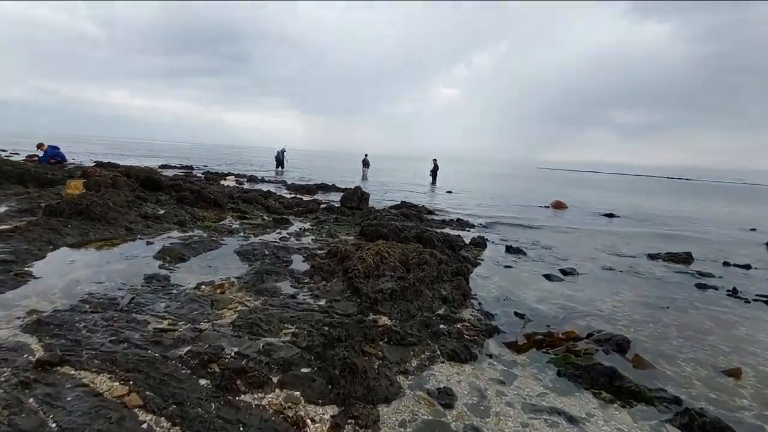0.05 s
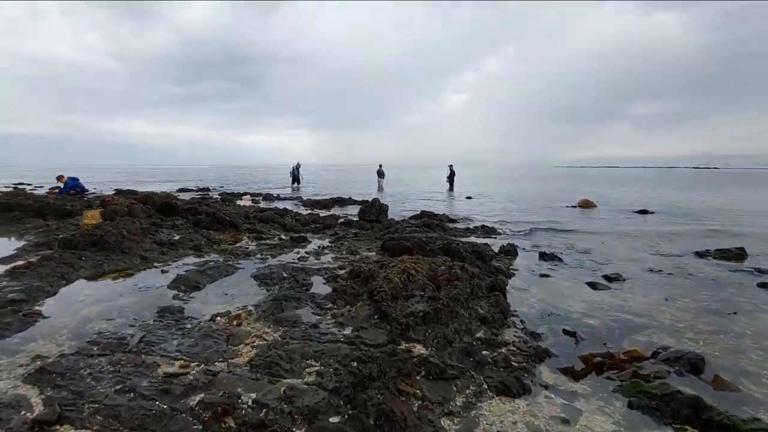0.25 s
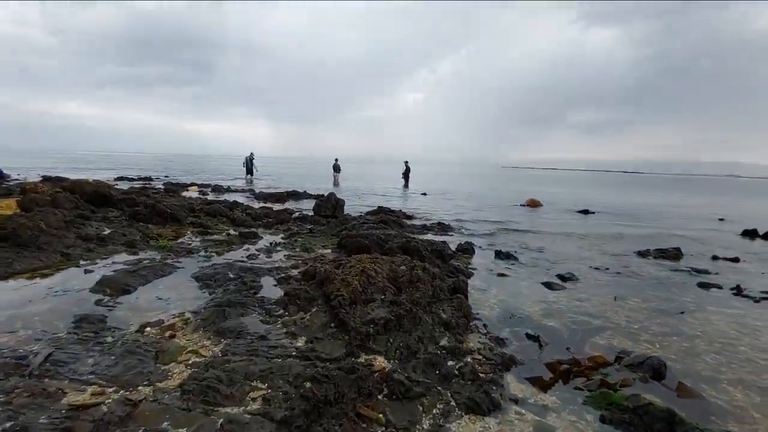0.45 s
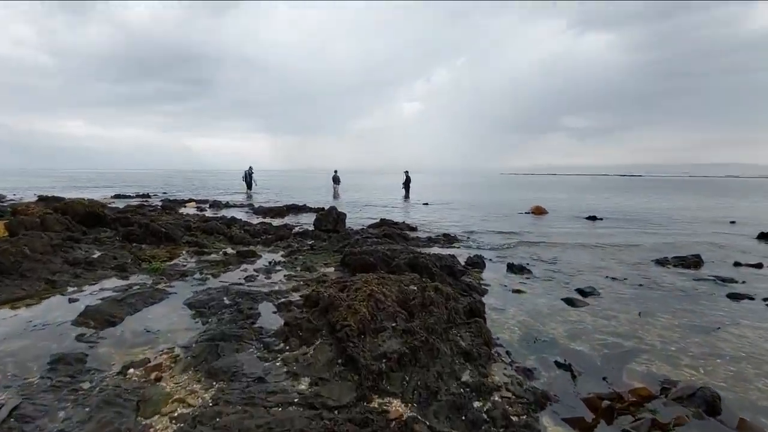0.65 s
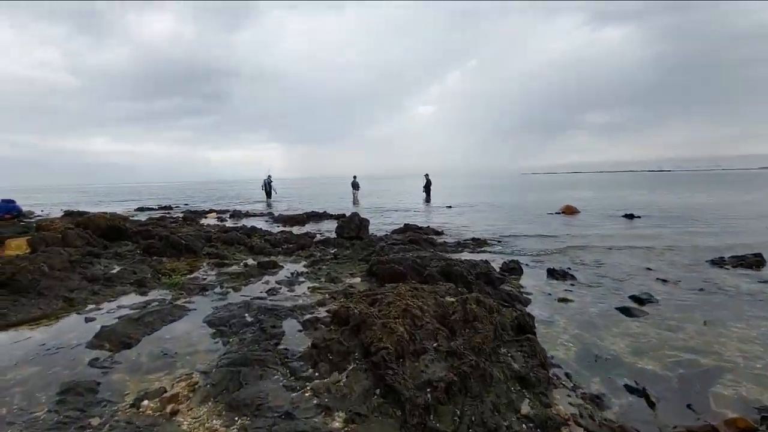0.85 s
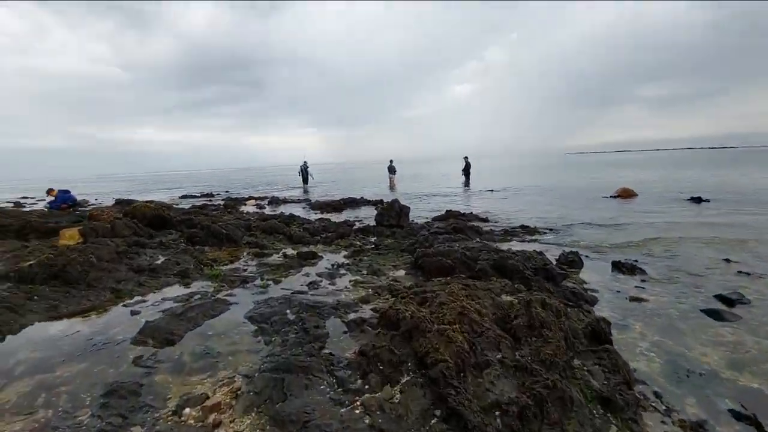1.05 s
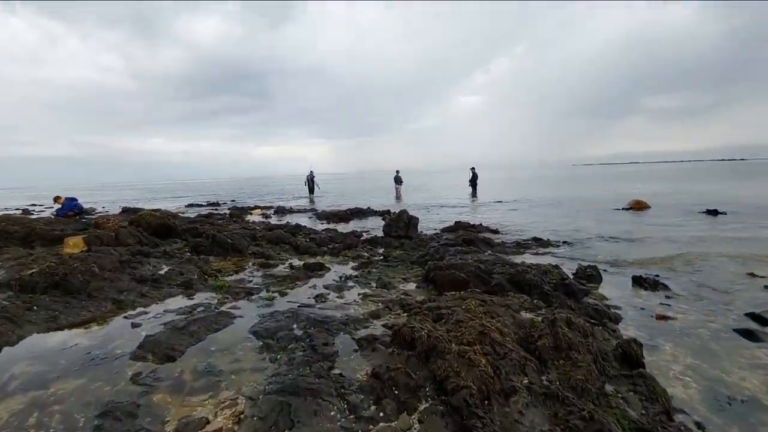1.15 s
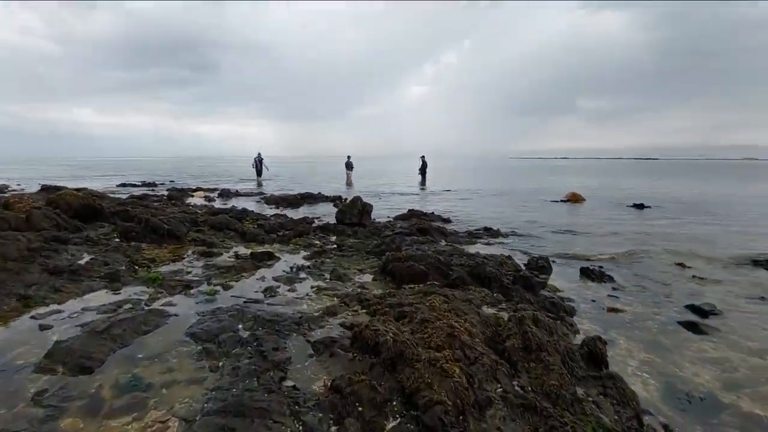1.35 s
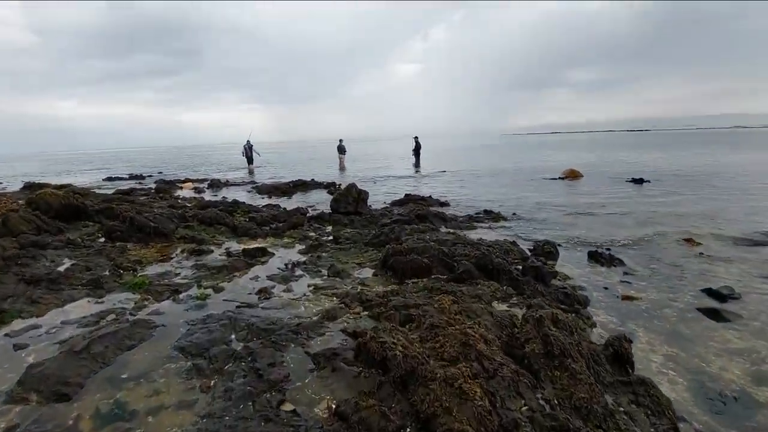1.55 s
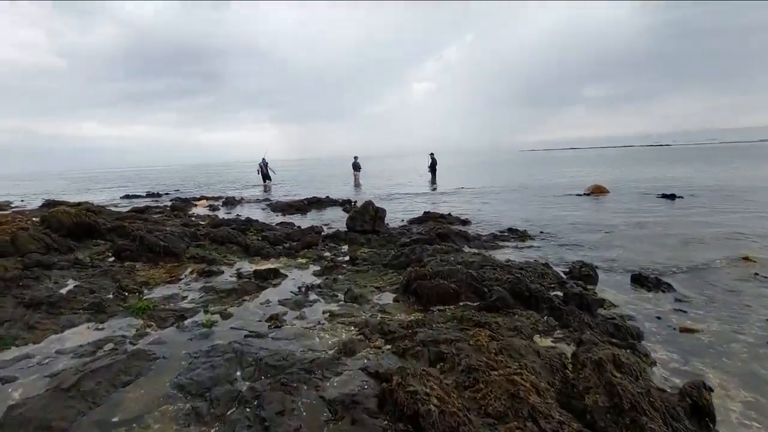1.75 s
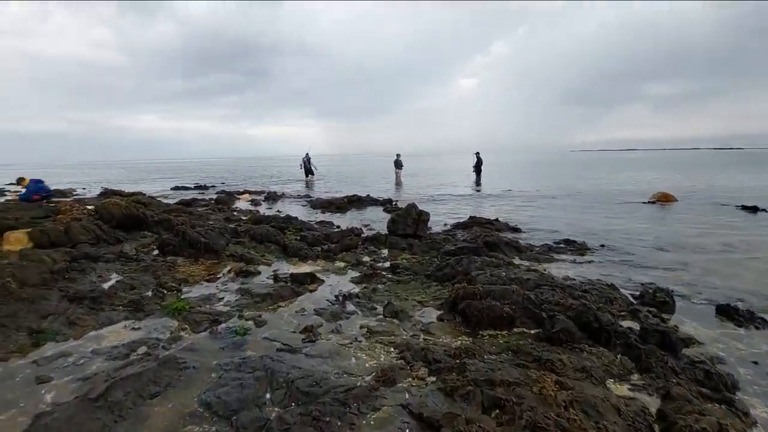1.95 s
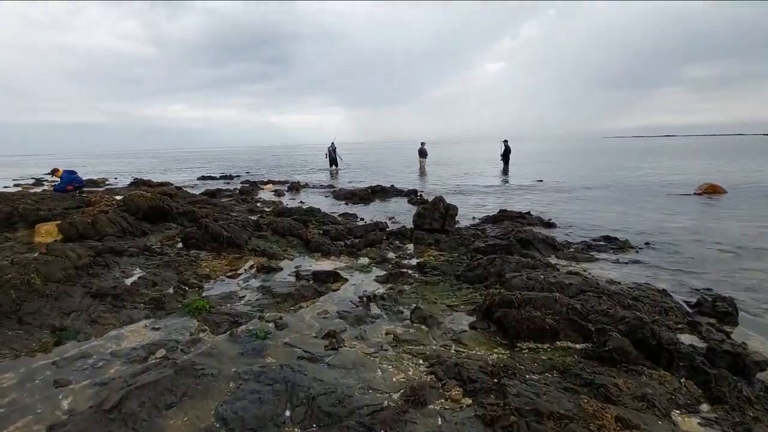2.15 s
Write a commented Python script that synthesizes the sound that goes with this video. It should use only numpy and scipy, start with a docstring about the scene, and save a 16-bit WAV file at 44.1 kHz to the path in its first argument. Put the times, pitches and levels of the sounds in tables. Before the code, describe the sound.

Footsteps knock and crunch on wet, gritty shore rock, with water trickling and wind buffeting.

```python
"""Someone walks over wet, weedy shore rock with a small camera. From the start a calm sea washes,
water fizzes and trickles, and wind buffets the microphone, mostly on the left. A few grains snap,
then from a quarter second on a step lands about every half second: soles knock, grit crunches,
grains and weed bladders snap. From 1.4 s air pockets gurgle in the pools. The last step comes
near 1.8 s, and the sea and the trickle are at their loudest toward the end."""
import sys
import numpy as np
from scipy import signal
from scipy.fft import rfft, irfft
from scipy.io import wavfile
from scipy.ndimage import uniform_filter1d

SR = 44100
rng = np.random.default_rng(int(sys.argv[2]) if len(sys.argv) > 2 else 0)


def dump_mix(stems):
    """Bounce the given channels to the path in sys.argv[1] as a 16-bit WAV at rate SR."""
    frames = np.atleast_2d(stems).T  # one column per channel
    limited = np.clip(frames, -1, 1)  # hard clip at full scale
    pcm = np.round(limited * 32767).astype(np.int16)
    wavfile.write(sys.argv[1], SR, pcm)


N = 97020  # 2.2 seconds

# The tone of crunching grit as the camera's microphone hears it, with a dip at 7-9 kHz.
# Each row: frequency in Hz, level in dB.
GRIT_COLOUR = [(100, -28.5), (300, -2.5), (800, -2.5), (1500, -0.5), (2800, -3), (5400, -1.5), (6800, -11),
               (8600, -14), (11500, -10), (15500, -17)]
STEP_WIDTH = 0.66  # 0 is centred, 1 is wide
SPRAY_PER_S, SPRAY_SPREAD_DB = 16000, 3  # the tiny clicks in fizz and trickle
GLIDE_PER_S = 6.07  # a bubble's pitch climbs by this many times its starting pitch each second


def undb(db):
    """Turn decibels into a number to multiply by."""
    return 10 ** (np.asarray(db) / 20)


def unit(x):
    """Scale a signal to an average power of 1."""
    return x / np.sqrt(np.mean(x ** 2) + 1e-20)


def clock():
    """The time of each sample in seconds."""
    return np.arange(N) / SR


def freqs():
    """The frequency in Hz of each slot in a spectrum."""
    return np.maximum(np.arange(N // 2 + 1) * SR / N, 1)


def shape(points):
    """Join (Hz, dB) points into a gain for every frequency."""
    hz, db = np.array(points).T
    return undb(np.interp(np.log(freqs()), np.log(hz), db))


def colour(x, gain):
    """Change the tone by a gain for every frequency; white noise keeps its power."""
    cepstrum = irfft(np.log(unit(gain) + 1e-9), N)
    # Fold the second half onto the first, so the filter rings after a click and not before.
    cepstrum[1:N // 2] *= 2
    cepstrum[N // 2 + 1:] = 0
    return irfft(rfft(x) * np.exp(rfft(cepstrum)), N)


def curve(points):
    """Join (seconds, dB) points into a gain for every sample."""
    return undb(np.interp(clock(), *np.array(points).T))


def wander(turns_per_s):
    """A random drift, about 1 in size."""
    hold = int(SR / turns_per_s)
    stairs = np.repeat(rng.standard_normal(N // hold + 1), hold)
    return unit(uniform_filter1d(stairs, hold)[:N])


def spread(pair, width, wide_hz=1090):
    """Mix two unrelated signals into left and right; the bass stays in the middle."""
    share = width * freqs() / np.hypot(freqs(), wide_hz)
    mid, side = rfft(pair)
    return irfft(np.array([mid + share * side, mid - share * side]) / np.sqrt(1 + share ** 2), N)


def grains(per_s, spread_db):
    """Two streams of tiny clicks, a few much larger than the rest."""
    size = undb(spread_db * np.minimum(rng.exponential(size=(2, N)), 5))
    hits = rng.random((2, N)) < per_s / SR
    return unit(hits * size * np.sign(rng.standard_normal((2, N))))


def ring(start, hz, decay_s, rise_s, glide=0, left_lag_s=0.0001):
    """A fading tone that reaches the left side a moment after the right."""
    out = np.zeros((2, N))
    first = int(np.clip(start * SR, 0, N - 1))
    last = min(N, first + int(10 * (decay_s + rise_s) * SR))
    t = np.maximum(np.arange(first, last) / SR - start - np.array([[left_lag_s], [0]]), 0)
    level = (1 - np.exp(-(t / rise_s) ** 2)) * np.exp(-t / decay_s)
    out[:, first:last] = level / (level.max() + 1e-9) * np.sin(2 * np.pi * hz * t * (1 + glide * t / 2))
    return out


def bubbles(per_s, low_hz, octaves, decay_cycles):
    """Bubbles ring at random times, pitches and places, each sliding upward."""
    out = np.zeros((2, N))
    for when, pitch, size, side in rng.random((1000, 4))[:int(per_s * N / SR)]:
        hz = low_hz * 2 ** (octaves * pitch)
        first = int(when * N)
        t = np.arange(min(N - first, int(np.log(1000) * decay_cycles / hz * SR))) / SR
        level = undb(20 * size - 25) * (1 - np.exp(-t * hz)) * np.exp(-t * hz / decay_cycles)
        tone = np.sin(2 * np.pi * hz * t * (1 + GLIDE_PER_S * t / 2))
        pan = np.sqrt([[2 * side], [2 - 2 * side]])
        out[:, first:first + len(t)] += pan * level * tone
    return out


def flicker(spectrum, band_position, bands, depth_db, turns_per_s):
    """Turn a spectrum into sound whose bands swell and fade on their own, as in moving water."""
    out = 0
    for centre in bands:
        band = np.maximum(1 - abs(band_position - centre), 0)
        out = out + irfft(spectrum * band, N) * undb(depth_db * wander(turns_per_s))
    return unit(out)


def sea():
    """Small waves make a flickering wash with bubbles in it."""
    # How the wash swells. Each row: time in seconds, level in dB.
    swell = [(0, -51), (.11, -52), (.18, -58.5), (.28, -50), (.5, -55), (.58, -51.5), (.7, -54), (.9, -50),
             (1.05, -53), (1.21, -58), (1.42, -52), (1.62, -47), (1.69, -49), (1.85, -46), (1.99, -51.5),
             (2.08, -45.5), (2.2, -46)]
    # Its tone. Each row: frequency in Hz, level in dB.
    tone = [(100, -23.5), (200, -4), (320, 0.5), (550, 0.5), (900, 0), (1400, -8), (2300, -17.5),
            (5500, -21), (15500, -27)]
    water = spread(rng.standard_normal((2, N)), width=1)
    spectrum = rfft(water) * unit(shape(tone))
    wash = flicker(spectrum, np.log2(freqs()), range(6, 15), depth_db=5, turns_per_s=28.23)
    bubbling = bubbles(per_s=120, low_hz=394, octaves=5, decay_cycles=4.3)
    return (wash + undb(-12.5) * bubbling) * curve(swell)


def fizz():
    """Countless tiny bubbles burst on wet rock and weed."""
    # How the fizz swells. Each row: time in seconds, level in dB.
    swell = [(0, -53.5), (.22, -62), (.27, -52.5), (.45, -50.5), (.56, -55), (.71, -52.5), (.91, -48.5),
             (1.08, -51), (1.16, -50), (1.22, -56.5), (1.3, -53), (1.41, -61.5), (1.66, -56), (1.8, -52.5),
             (1.88, -54.5), (2.2, -55)]
    # Its tone at the microphone. Each row: frequency in Hz, level in dB.
    tone = [(2000, 2), (5000, -1), (7000, -6.5), (8500, -4.5), (10500, 1), (12100, 4), (13700, 1),
            (15500, -4.5)]
    bursts = spread(grains(SPRAY_PER_S, SPRAY_SPREAD_DB), width=1.01)
    return colour(bursts, shape(tone)) * curve(swell)


def trickle():
    """Thin water spills over the rock: a shifting, splashy hiss with small drops."""
    # How the trickle swells. Each row: time in seconds, level in dB.
    swell = [(0, -54), (.2, -54.5), (.27, -48), (.45, -48.5), (.56, -51.5), (.7, -50), (.92, -47.5),
             (.97, -53), (1.05, -55.5), (1.22, -54), (1.3, -53), (1.42, -56.5), (1.63, -52), (1.7, -52),
             (1.8, -51.5), (1.88, -51), (1.95, -45), (2.07, -46.5), (2.2, -46)]
    # The tone of its hiss at the microphone. Each row: frequency in Hz, level in dB.
    tone = [(600, -4), (1400, -5.5), (2300, 2.5), (3200, -3.5), (4400, 0), (5700, 0.5), (7000, -8.5),
            (8500, -37), (15500, -12)]
    splashes = spread(grains(SPRAY_PER_S, SPRAY_SPREAD_DB), width=1)
    spectrum = rfft(colour(splashes, shape(tone)))
    quarter_octaves = 4 * np.log2(freqs() / 500)
    hiss = flicker(spectrum, quarter_octaves, range(21), depth_db=4, turns_per_s=22)
    drops = bubbles(per_s=110, low_hz=1495, octaves=2.6, decay_cycles=9.6)
    return (hiss + undb(7) * drops) * curve(swell)


def wind(right_rumble_db=-82):
    """Wind rumbles on the microphone's left side, which faces it, and puffs on both sides."""
    # The rumble on the left. Each row: time in seconds, level in dB.
    left_rumble = [(0, -46.5), (.52, -42.5), (.6, -56), (.75, -40), (1.55, -43.5), (1.85, -38.5),
                   (2.07, -47), (2.2, -40)]
    # Brief puffs. Each row: peak time and half length in seconds, left and right level in dB.
    puffs = [(0.085, 0.031, -46, -38), (0.112, 0.0069, -34.5, -44), (.76, 0.011, -47, -41),
             (0.898, 0.023, -43, -38), (1.121, 0.014, -40, -33.5), (1.359, 0.02, -37, -47),
             (1.773, 0.017, -45, -44), (1.959, 0.0067, -40, -73), (2.177, .012, -60, -48)]
    # The wind's deep tone. Each row: frequency in Hz, level in dB.
    tone = [(15, -23.5), (30, -6), (55, 3), (75, -2), (100, -11), (135, -8), (200, -20), (400, -21.5),
            (1500, -102)]
    level = np.array([curve(left_rumble), np.full(N, undb(right_rumble_db))])
    for peak, half, left_db, right_db in puffs:
        level += undb([[left_db], [right_db]]) * np.exp(-((clock() - peak) / half) ** 2)
    return level * colour(rng.standard_normal((2, N)), shape(tone))


def snaps(rise_s=0.00072, crack_s=0.00095, spray_s=0.0059, spray_db=-9):
    """Single grains and weed bladders snap: a crack, a short ring and a faint spray."""
    # Each row: start in seconds, ring level in dB, pitch in Hz, ring fade time in ms,
    # crack level in dB, extra crack brightness in dB per octave.
    events = [(0.0415, -32, 2520, 0.7, -29, 1.5), (.078, -39, 2320, 1, -39, -0.5),
              (.2496, -21.5, 2720, 1.7, -28, 1), (.352, -15, 3080, 1.5, -17.5, 0.5),
              (0.365, -29, 3560, 0.49, -16, 12), (0.3734, -29, 4230, 0.63, -15, 0),
              (0.3916, -21, 2970, .5, -28, -15), (0.4092, -12, 1525, .9, -24, -3),
              (.4793, -20.5, 1600, 0.82, -23.5, -1.3), (.493, -34, 1700, .8, -30, -2.5),
              (0.507, -24, 3900, 0.93, -33, -4.5), (.523, -30.5, 2330, 0.56, -34.5, -4),
              (0.5942, -17.5, 4150, 1.2, -26, 0.5), (0.712, -35, 1720, 0.8, -36, -4.5),
              (.7598, -23, 2250, .8, -27.5, -4.5), (0.797, -16, 2100, 0.48, -37, 13),
              (0.806, -21.5, 1290, 1.8, -37, -1), (.812, -18, 1630, 0.77, -24.5, 4),
              (0.8159, -19, 2030, 2.6, -37, 3), (0.878, -31, 4070, 1, -57, 0),
              (1.0215, -62, 1720, 0.65, -32, -4), (1.2668, -23, 4570, 3, -37, 15),
              (1.2787, -34.5, 11800, 2, -31, 5.5), (1.4462, -44, 1000, 2.1, -43.5, 4.5),
              (1.847, -34.5, 3460, 2.7, -54, 8), (1.858, -36.5, 3320, 3.5, -55, 4)]
    out = 0
    noise = spread(rng.standard_normal((2, N)), STEP_WIDTH)
    for start, ring_db, hz, fade_ms, crack_db, tilt in events:
        age = np.maximum(clock() - start, 0)
        fade = np.exp(-age / crack_s) + undb(spray_db) * np.exp(-age / spray_s)
        burst = np.minimum(age / rise_s, 1) * fade * noise
        crack = colour(burst, shape(GRIT_COLOUR) * undb(tilt * np.log2(freqs() / hz)))
        ping = ring(start, hz, fade_ms / 1000, rise_s=0.0003)
        out = out + undb(ring_db) * ping + undb(crack_db) * crack
    return out


def knocks(rise_s=0.00093, overtone_ratio=2.31, overtone_db=-6):
    """The sole meets rock with a short, hollow knock."""
    # Each row: start in seconds, level in dB, pitch in Hz, fade time in ms.
    events = [(0.2483, -21, 284, 3.3), (.3365, -29, 520, 2.2), (.479, -28, 483, 1.3), (.729, -34, 306, 4.3),
              (0.7784, -23.5, 353, 1.94), (1.252, -27, 242, 1.3), (1.2579, -30.5, 805, 1.2),
              (1.2849, -29, 840, 0.68), (1.448, -36, 470, 2.7), (1.7527, -27.5, 940, 0.67),
              (1.7602, -24, 309, 7.1)]
    out = 0
    for start, db, hz, fade_ms in events:
        body = ring(start, hz, fade_ms / 1000, rise_s)
        overtone = ring(start, hz * overtone_ratio, fade_ms / 1000 / 2, rise_s)
        out = out + undb(db) * (body + undb(overtone_db) * overtone)
    return out


def crunches(rise_s=0.0027, gap_db=6.5, gap_octaves=0.37):
    """Weight rolls onto grit, and dense clicks make the gap under the sole ring."""
    # Each row: start, hold time and fade time in seconds, level in dB, pitch of the gap in Hz,
    # extra brightness in dB per octave.
    events = [(.335, 0.028, 0.0078, -32.5, 755, 0.5), (0.35, 0.024, 0.019, -30, 3720, -1),
              (.386, 0.048, 0.011, -37.5, 1360, -0.7), (0.49, 0.024, 0.0067, -44.5, 1440, -5.5),
              (0.754, 0.02, 0.0091, -45.5, 2250, -2.5), (0.7762, 0.02, 0.0033, -32, 6050, 0.3),
              (0.795, 0.026, 0.0055, -30, 1920, -0.2), (0.846, 0.0074, 0.026, -46, 1380, -3.5),
              (1.254, 0.03, 0.01, -41, 1150, -2.5), (1.755, 0.0037, 0.0086, -36.5, 1250, -2),
              (1.778, 0.029, 0.019, -47, 2750, -2), (1.811, 0.031, 0.012, -44.5, 5400, 5)]
    out = 0
    grit = spread(grains(per_s=7500, spread_db=1.97), STEP_WIDTH)
    for start, hold, fade, db, hz, tilt in events:
        age = clock() - start
        pressure = np.clip(age / rise_s, 0, 1) * np.exp(-np.maximum(age - hold, 0) / fade)
        octaves = np.log2(freqs() / hz)
        boost_db = tilt * octaves + gap_db * np.exp(-(octaves / gap_octaves) ** 2)
        out = out + undb(db) * colour(grit * pressure, shape(GRIT_COLOUR) * undb(boost_db))
    return out


def gurgles():
    """Pockets of air ring in the pools and rise in pitch."""
    # Each row: start in seconds, peak level in dB, starting pitch in Hz.
    events = [(1.38, -46.5, 704), (1.453, -41, 232), (1.468, -45.5, 861), (1.501, -45, 270),
              (1.599, -43.5, 261), (1.619, -41.5, 867), (1.725, -42, 422), (1.836, -44, 432),
              (1.895, -36.5, 279.6), (1.92, -38, 432), (2.012, -40.5, 302), (2.046, -44, 2330),
              (2.065, -45, 2120), (2.098, -69, 434)]
    return sum(undb(db) * ring(start, hz, decay_s=0.0093, rise_s=0.0075, glide=GLIDE_PER_S)
               for start, db, hz in events)


def reflect(x):
    """Add the quick echoes that bounce off nearby rock and the walker."""
    # Each row: delay in ms, echo level in dB.
    bounces = [(.85, -22), (2.7, -18.5), (8.5, -21.5)]
    echoes = sum(undb(db) * np.exp(-2j * np.pi * freqs() * ms / 1000) for ms, db in bounces)
    return irfft(rfft(x) * (1 + echoes), N)


def scene():
    """Steps close below, water all around, wind on the microphone."""
    pan = undb([[-0.3], [0.3]])  # the steps sit a touch to the right
    steps = pan * (knocks() + reflect(crunches() + snaps()))
    return steps + wind() + fizz() + gurgles() + trickle() + sea()


def record(dry, top_hz=15780):
    """The camera cuts off the highest treble."""
    return signal.sosfilt(signal.ellip(10, .2, 80, top_hz, fs=SR, output="sos"), dry)


dry = scene()
out = record(dry)
dump_mix(out)
```